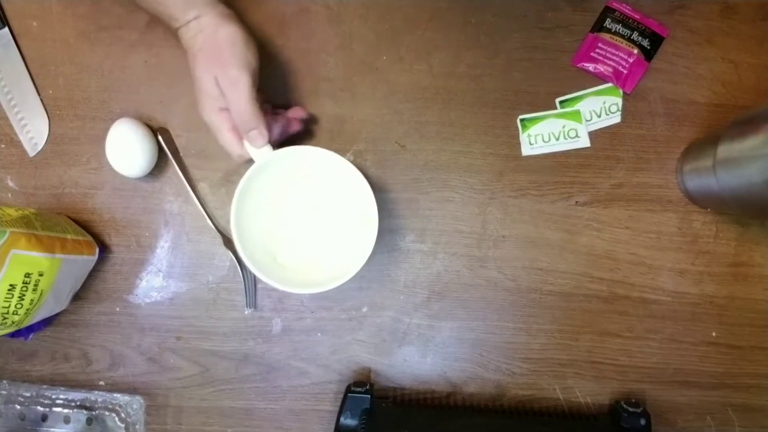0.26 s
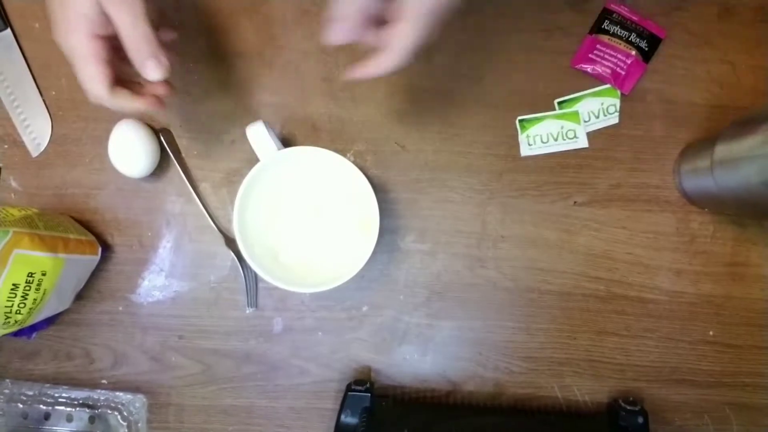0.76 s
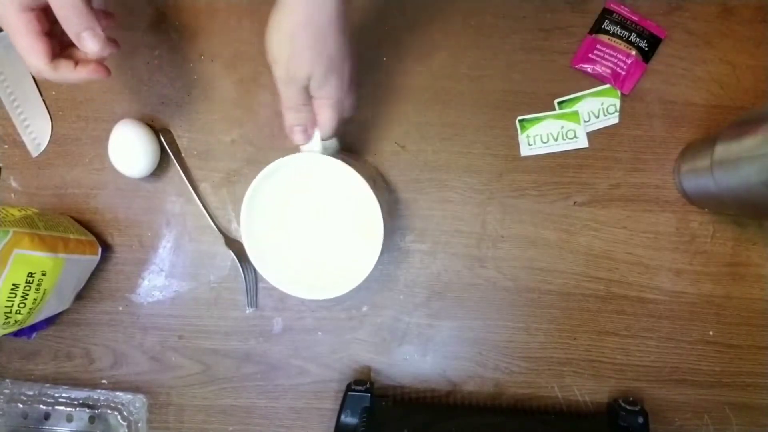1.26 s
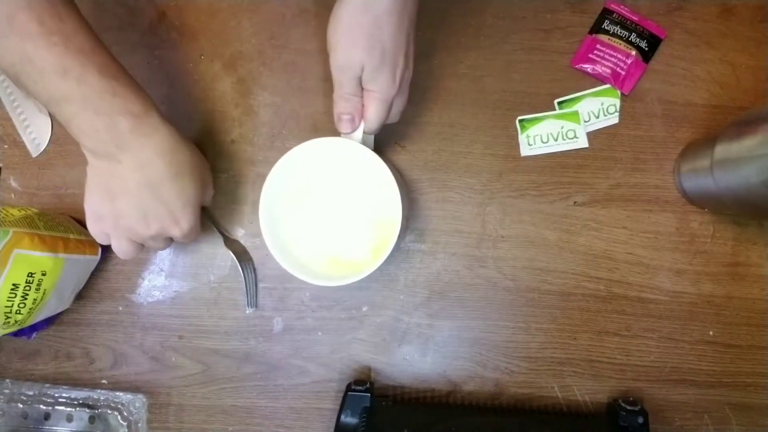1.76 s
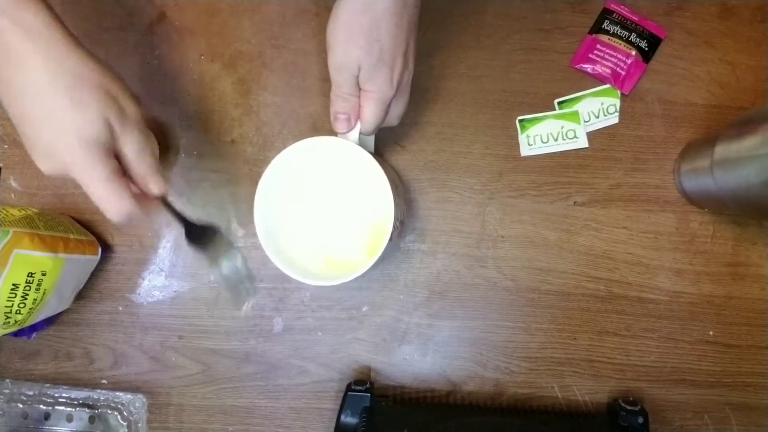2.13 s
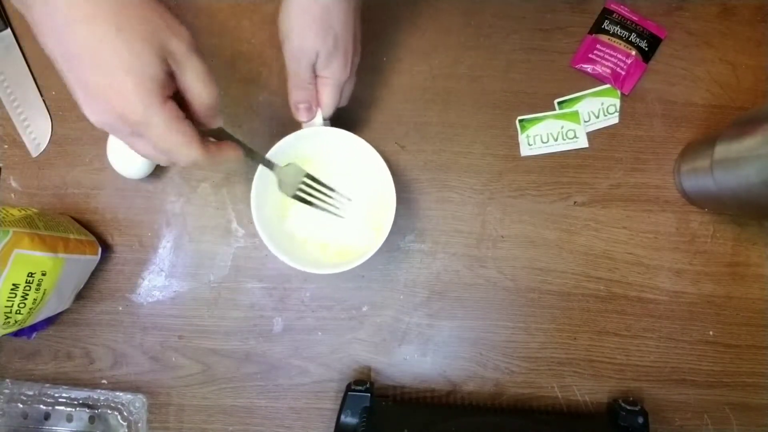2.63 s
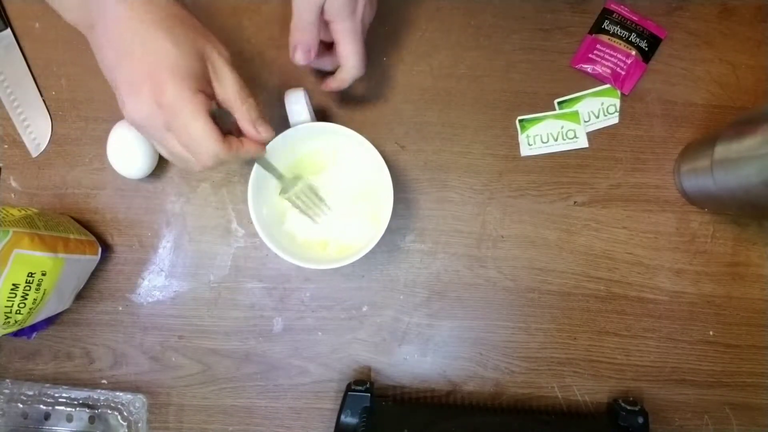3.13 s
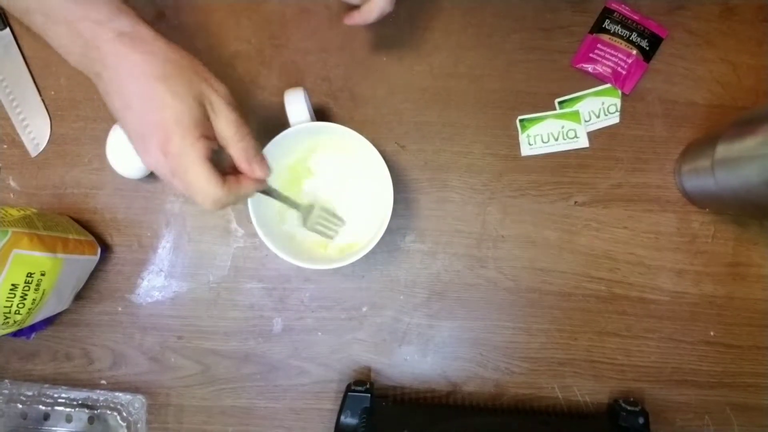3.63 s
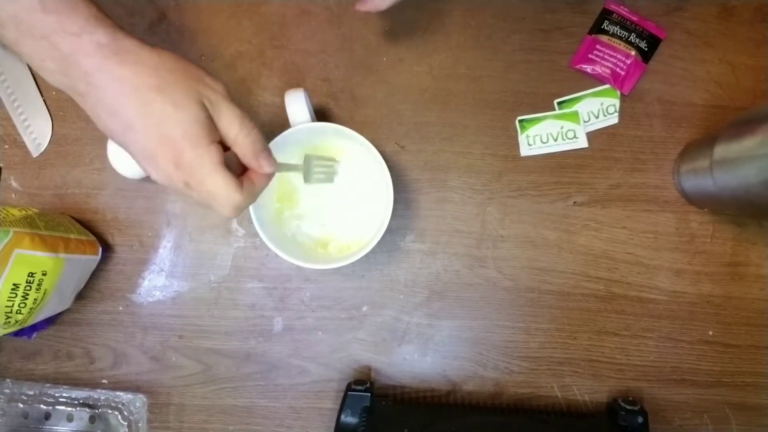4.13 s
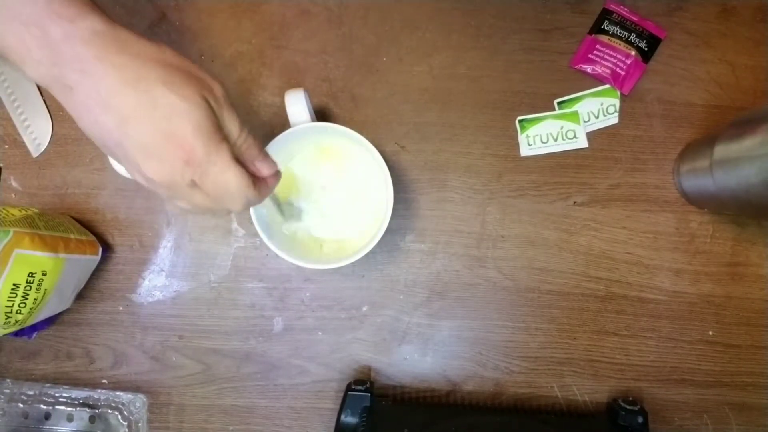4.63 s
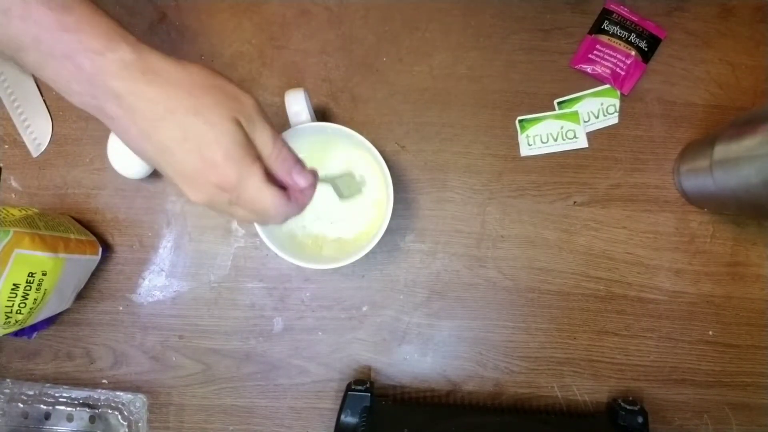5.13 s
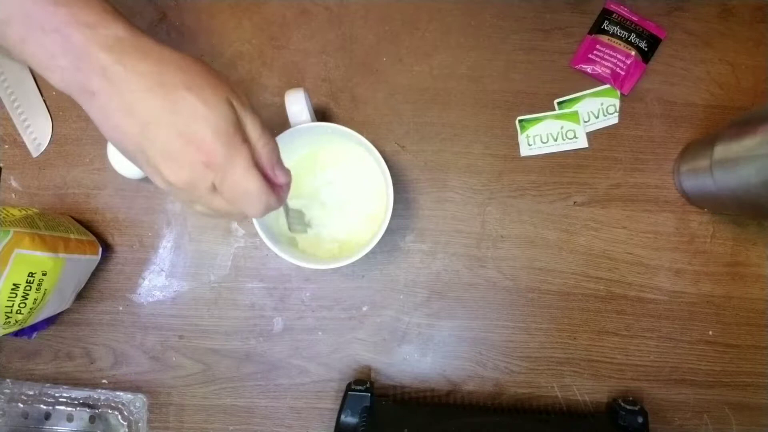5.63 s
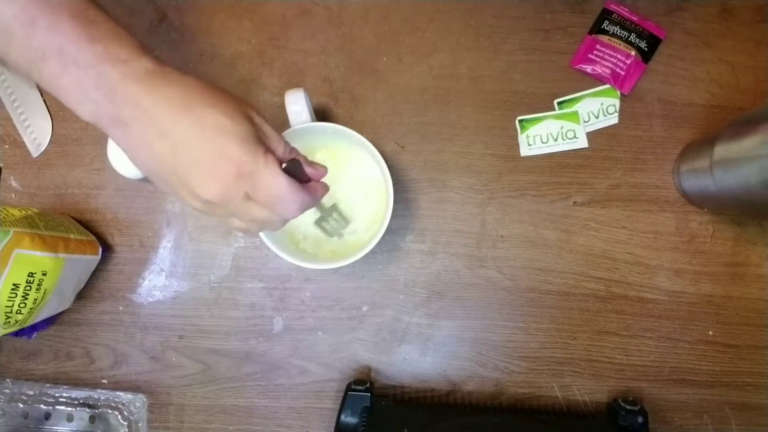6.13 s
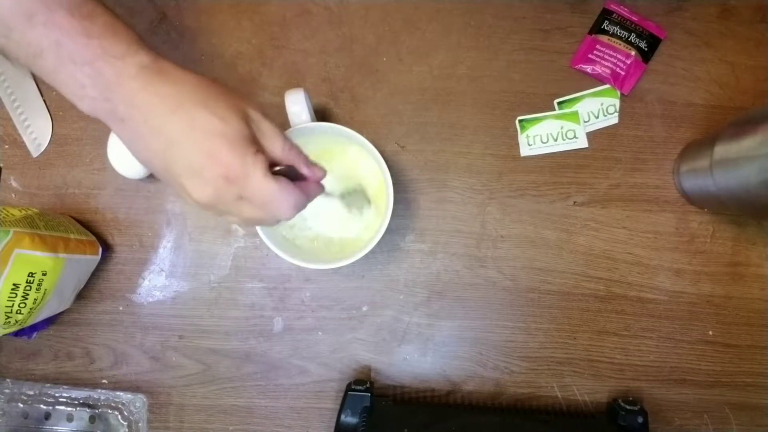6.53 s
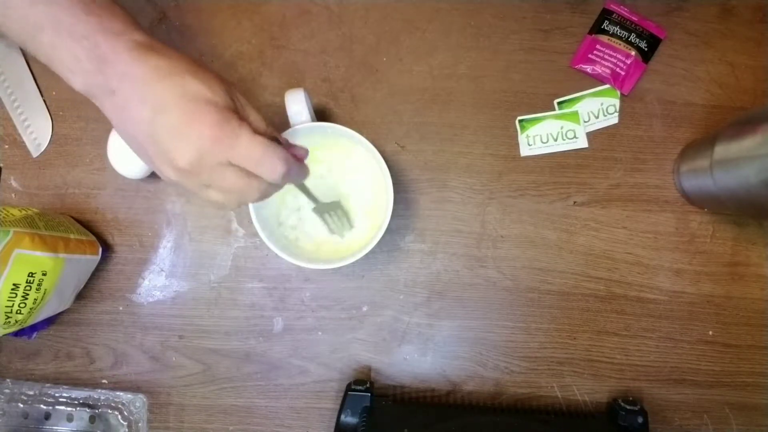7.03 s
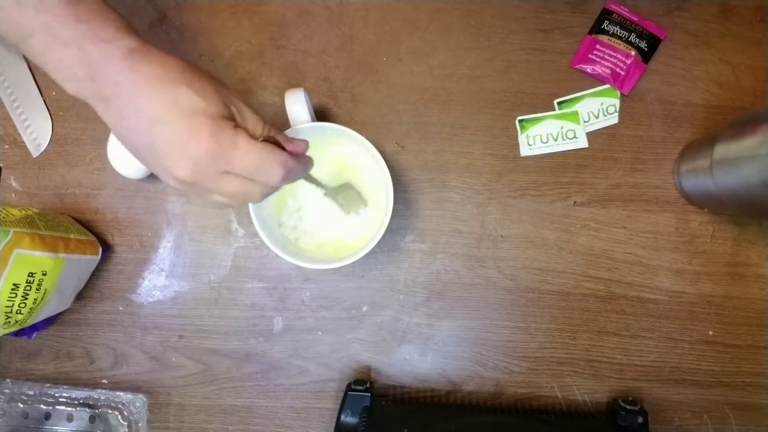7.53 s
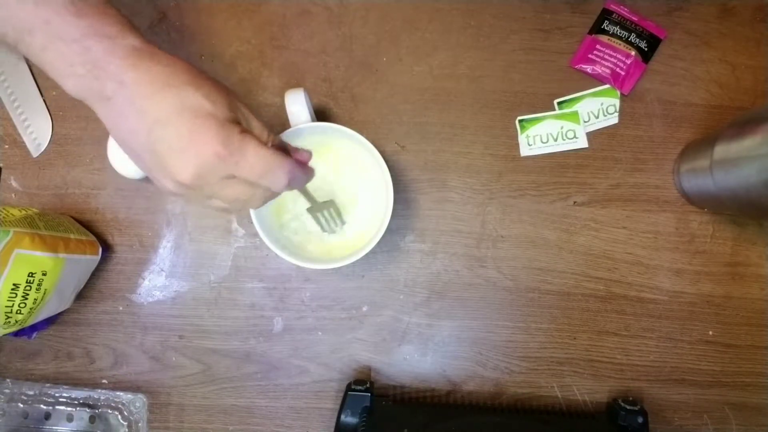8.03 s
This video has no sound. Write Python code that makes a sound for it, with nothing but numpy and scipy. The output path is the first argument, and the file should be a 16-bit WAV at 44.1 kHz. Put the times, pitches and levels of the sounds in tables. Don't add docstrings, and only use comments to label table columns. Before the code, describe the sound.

A ceramic mug lands on a wooden table with a hard knock, slides briefly and is shifted again. A fork is picked up with a small scrape, then stirs in the mug: hissing scrapes, quick bright taps, two clear ringing clinks and a thin squeak at the end. Low appliance rumble and faint buttery ticking lie behind it, heard in close stereo in a small, lightly echoing kitchen.

```python
import sys
import numpy as np
from scipy import signal
from scipy.fft import rfft, irfft, next_fast_len
from scipy.io import wavfile
from scipy.ndimage import uniform_filter1d, map_coordinates

SR = 44100
rng = np.random.default_rng(int(sys.argv[2]) if len(sys.argv) > 2 else 0)


def to_linear_factor(level_db):
    exponent = np.asarray(level_db, float) / 20
    return 10 ** exponent


def wrap_up_sound(samples):
    columns = np.atleast_2d(samples).T
    tamed = np.clip(columns, -1, 1)
    steps = np.round(tamed * 32767).astype(np.int16)
    wavfile.write(sys.argv[1], SR, steps)


N = 364707

# (frequency [Hz], density [dB per Hz])
GLAZE_COLOUR = [(600, -30.5), (1000, -10), (1500, 1.5), (2100, -14), (2500, -17), (3400, -12.5), (3900, -8),
                (4800, -7.5), (6300, -7.5), (7500, -8), (9200, -9), (12300, -2), (14100, -8.5),
                (15500, -19)]


def fork_hits():
    # (frequency [Hz], decay t60 [s], left-right difference
    # [dB], left lead [rad])
    mug_and_tine_modes = [(1549.5, .72, 10, 2.5), (1667.5, .56, -7, -.6), (3959, .2, 8, -2.4),
                          (4091, .36, -13, -1.6), (4153, .2, -2, -1.5), (5397, .23, 3, 1.6), (5652, .18, -3, .5),
                          (7569, .23, 10, .5), (7800, .15, -8, 2.1), (9900, .15, -10, .4), (10335, .3, -4, 1.1),
                          (11795, .13, -7, 1), (12235, .2, -4, .3), (13200, .17, -8, 1.4)]
    # (time [s], crack level [dB], level of each mode of mug and tine [dB])
    clinks = [
        (4.633, -28, [-29.5, -23, -23.5, -9, -31.5, -40.5, -45, -38, -32, -72, -66.5, -51, -66, -78.5]),
        (7.294, -27, [-25, -16.5, -23.5, -27.5, -21.5, -21.5, -44, -25.5, -37, -34.5, -63.5, -40, -49.5, -44.5]),
    ]
    rests = [.1, .2]
    # (time [s], crack level [dB], wall ring level [dB], place on the rim [degrees])
    taps = [(0.1418, -57, -44, 120), (1.895, -53, -74, 41), (3.012, -42, -85, 34), (3.085, -43, -89, 37),
            (3.211, -49.5, -89, 45), (3.269, -39, -79, 35), (3.4308, -53, -51, 78), (3.662, -43, -65, 29),
            (3.7732, -29.5, -55, 100), (3.801, -49, -39, 73), (3.907, -34, -61, 86),
            (4.2615, -42.5, -60, 21), (4.329, -36, -57, 58), (4.473, -32, -44, 29), (4.531, -33.5, -55, 89),
            (5.1355, -28, -50, 72), (5.205, -60, -50, 50), (5.587, -53.5, -82, 21),
            (5.877, -28.5, -56.5, 16), (6.004, -56, -53.5, 96), (6.154, -76, -52, 56),
            (6.218, -35.5, -62, 91), (6.49, -34.5, -57, 4), (6.4992, -28.5, -38, 2.5),
            (6.751, -41, -89, 20), (6.9302, -42, -59.5, 12), (7.136, -53.5, -48.5, 3),
            (7.186, -34.5, -47, 66), (7.618, -69, -53, 68), (8.074, -55, -63, 11),
            (8.114, -45.5, -42.5, 33)]
    # (time [s], level [dB])
    pings = [
        (1.9, -72),
        (3.774, -57),
        (4.328, -53),
        (5.137, -25.5),
        (5.589, -57.5),
        (6.216, -56),
        (6.49, -47),
    ]
    cracks, rings, touch = np.zeros((2, N)), np.zeros((2, N)), np.zeros((2, N))

    rebound_s, first_touch = 0.0043, 0.55
    for (s, db, levels), free in zip(clinks, rests):
        add(cracks, s, crack(db, t60=0.013))
        add(cracks, s + rebound_s, crack(db - 5.0, t60=0.029))
        clink = sum(ring(m, level, attack=0.00054, free=free, at=s) for m, level in zip(mug_and_tine_modes, levels))
        late = np.clip((np.arange(clink.shape[1]) / SR - rebound_s) / 0.001, 0, 1)
        add(rings, s, clink * (first_touch + (1 - first_touch) * late))

    for s, db, wall_db, place in taps:
        low = ring(mug_and_tine_modes[0], wall_db + 3, attack=0.014, life=0.8, span=0.5, at=s)
        second = ring(mug_and_tine_modes[1], wall_db + 0.5, attack=0.009, life=0.85, span=0.5, at=s)
        angle = np.radians(place)
        add(touch, s, np.cos(angle) * low + np.sin(angle) * second)
        add(cracks, s, crack(db - 15.0, t60=0.023))

    for s, db in pings:
        add(touch, s, ring(mug_and_tine_modes[6], db, attack=0.0072))
    return cracks, (rings + touch) * to_linear_factor(0.9 * wobble(30))


def crack(db, t60):
    t = np.arange(SR // 8) / SR
    glints = rng.uniform(3830, 14000, 5)

    def bright(f):
        glaze = to_linear_factor(along(GLAZE_COLOUR, f)) + 0.069 * (f > 1500) * (f < 15500)
        return glaze * (0.65 + 1.4 * sum(peak(f, hz, 270) for hz in glints))

    tick = 2.6 * to_linear_factor(-60 * t / 0.006)
    shape = (to_linear_factor(-60 * t / t60) + tick) * (1 - np.exp(-t / 0.0002))
    return to_linear_factor(db) * shape * unit(filtered(rng.standard_normal((2, len(t))), bright))


def ring(mode, db, attack, free=1, life=1, span=0.66, at=None):
    hz, t60, pan_db, lead = mode
    t = np.arange(int(SR * span)) / SR
    side = np.array([[0.5], [-0.5]])
    share = to_linear_factor(side * pan_db) / np.sqrt(np.mean(to_linear_factor(side * pan_db) ** 2))
    start = rng.random()
    if at is not None and hz < 2000:
        start = hz * round(at * SR) / SR
    wave = np.sin(2 * np.pi * (hz * t + start) + side * lead)
    damped_db = 400 * np.maximum(t - free, 0) * (hz > 3000)
    decay = to_linear_factor(db - 60 * t / (t60 * life) - damped_db)
    return share * decay * (1 - np.exp(-t / attack)) * wave


def stirring():
    # (time [s], time to fade [s], glaze hiss [dB],
    # mug hollow over hiss [dB], stem over hiss [dB])
    skids = [(1.898, 0.092, -62.5, -2, 5), (3.772, 0.14, -55.5, -1, 3), (3.907, 0.23, -61, -7, -1),
             (4.26, 0.16, -61.5, -4, -0.5), (4.329, 1, -64.5, -4, 1.5), (4.634, 0.05, -41.5, -9, 10),
             (5.137, 0.046, -42.5, -27, 6), (5.21, 0.23, -66.5, -13, 1.5), (5.589, 0.22, -66.5, -3, 5),
             (5.877, 0.1, -54, -7, -3.5), (6.002, 0.075, -56.5, 0, 0.5), (6.215, 0.23, -56, -9, -1),
             (6.495, 0.089, -50.5, 4, -10.5), (6.751, 0.12, -70, -15, -3), (6.928, 0.084, -55, -4, -9.5),
             (7.135, 0.056, -59.5, -3, -4), (7.185, 0.47, -57.5, -23, -3), (7.296, 0.04, -37.5, -9, 2),
             (7.498, 0.17, -61.5, -17, -27.5), (8.112, 0.077, -53, -24, -30)]
    # (middle [s], half length [s], glaze hiss [dB],
    # mug hollow over hiss [dB], stem over hiss [dB])
    sweeps = [(3.4, 0.25, -59, -15, -3.5), (3.7, 0.16, -74.5, -19, 0), (4.055, 0.11, -59, -2, -2),
              (4.5, 0.13, -74.5, 6, 11.5), (4.61, 0.047, -57, -20, -12), (4.7, 0.082, -57.5, 4, 3),
              (4.81, 0.13, -54, 1, -4), (4.972, 0.051, -54, -8, 0), (5.07, 0.058, -57, 11.5, -3.5),
              (5.26, 0.19, -60.5, -25, -1), (5.35, 0.08, -67, 11, 1.5), (5.7, 0.072, -70.5, 8.5, 0.5),
              (5.78, 0.019, -76.5, 21.5, -23.5), (6.44, 0.073, -58, 0, -17.5), (6.58, 0.053, -56.5, 8, -16),
              (6.82, 0.05, -57.5, -1, -23), (7.38, 0.079, -52.5, 4.5, -3), (7.64, 0.12, -63, -19, -17),
              (7.74, 0.082, -58.5, 0, -17), (7.875, 0.065, -62, 15.5, -32), (8.04, 0.1, -64.5, -13, -24),
              (8.25, 0.073, -60.5, -31, -11.5)]
    # (middle [s], half length [s], level [dB])
    whistles = [(3.79, .03, -60), (4.055, .08, -64), (4.6, .04, -58), (4.985, .06, -52), (5.16, .05, -54),
                (5.325, .075, -51), (5.66, .11, -61), (6.83, .05, -64)]

    def layers(rows):
        return [(s, length, db, db + hollow_db, db + stem_db) for s, length, db, hollow_db, stem_db in rows]

    hiss, hollow, stem = fades(layers(skids)) + swells(layers(sweeps))
    tine = to_linear_factor(-13.5) * hiss + swells(whistles)[0]
    grit = to_linear_factor(2.5 * wobble(300) + 1.5 * wobble(40))
    glints = rng.uniform(2000, 14500, size=50)

    def glinting(f):
        return colour(GLAZE_COLOUR)(f) * (1 + to_linear_factor(2) * sum(peak(f, hz, 39.6) for hz in glints))

    def stem_and_neck(f):
        return peak(f, 2080, 200) ** 2 + to_linear_factor(-10.5) * peak(f, 2830, 475) ** 2

    rub = to_linear_factor(7) * hiss * unit(grit * patches(noise(glinting), patchy_db=4.0))
    rub += hollow * unit(to_linear_factor(2 * wobble(70)) * noise(lambda f: peak(f, 4620, 400) ** 2))
    return rub + tine * noise(lambda f: peak(f, 5652, 40)) + stem * noise(stem_and_neck)


def fork_notes():
    # (time [s], level [dB], low note [Hz], middle note [Hz], high note [Hz])
    landings = [(1.8981, -64, 4760, 8570, 12400), (3.2685, -47, 5030, 10000, 13800),
                (3.7714, -32.5, 5250, 11000, 12040), (3.908, -46, 5000, 11100, 12500),
                (4.2597, -43, 4970, 9340, 12100), (4.3291, -37, 5410, 9900, 11960),
                (5.1356, -24.5, 4900, 9900, 11670), (5.2094, -41, 5620, 8480, 13900),
                (5.877, -36, 5100, 9320, 11450), (6.0018, -41.5, 5000, 10000, 12400),
                (6.2167, -45, 4880, 10100, 11900), (6.4887, -35, 4690, 9840, 12500),
                (6.9293, -45.5, 6980, 9710, 12000), (7.1357, -45, 5490, 10800, 11840),
                (7.1843, -42, 4880, 9400, 12200)]
    shares_db, decays_s = (-13, -18, -5.5), (0.17, 0.036, 0.082)
    out = np.zeros((2, N))
    for s, db, *pitches in landings:
        for hz, share_db, t60 in zip(pitches, shares_db, decays_s):
            add(out, s, ring((hz, t60, 0, rng.normal()), db + share_db, attack=0.00065, span=0.15))
    return out * to_linear_factor(3.9 * wobble(200))


def clonks():
    # (time [s], frequency [Hz], level [dB], decay t60 [s])
    clonk_rows = [(.141, 828, -13, .06), (0.143, 970, -11, 0.031), (.14, 1506, -22.5, 0.057),
                  (.141, 1890, -26, 0.035), (4.635, 4100, -18, 0.06), (0.25, 980, -31, 0.036),
                  (.334, 620, -32, 0.091), (1.898, 2500, -43, 0.047), (5.137, 12000, -41.5, 0.054),
                  (7.2975, 4150, -4.5, 0.026), (5.136, 2120, -43, 0.036), (8.062, 1485, -55, 0.15),
                  (8.093, 1600, -49, 0.13), (8.112, 9830, -39, 0.025), (8.113, 11000, -38.5, 0.046)]
    out = np.zeros((2, N))
    for s, hz, db, t60 in clonk_rows:
        add(out, s, ring((hz, t60, -1, -0.4), db, attack=0.0022, span=0.15))
    return out


def scratches():
    # (time [s], peak level [dB], frequency [Hz])
    rough_spots = [(3.8945, -49, 12400), (4.0113, -36, 5000), (4.0472, -40, 7890), (4.6049, -48, 4140),
                   (4.7867, -39, 4730), (4.954, -39, 7570), (4.9721, -38, 5650), (5.0444, -41, 4780),
                   (5.058, -31, 4870), (5.3465, -45, 5650), (5.7688, -46, 4490), (6.3723, -38, 12100),
                   (6.551, -37, 4520), (6.7984, -39, 13800), (6.8194, -40, 4730), (7.4969, -43, 6010),
                   (7.7179, -34, 12400), (7.8491, -37, 4260), (7.866, -35, 4230), (7.9952, -52, 4360),
                   (8.2207, -32, 12000)]
    out = np.zeros((2, N))
    for s, db, hz in rough_spots:
        add(out, s, ring((hz, 0.026, 0, rng.normal()), db - 6, attack=0.001, span=0.06))
        add(out, s, crack(db - 26, t60=0.015))
    return out


def squeaks():
    # (middle [s], half length [s], tone level [dB], octave level [dB])
    squeak_rows = [
        (7.53, 0.035, -54.5, -76),
        (8.134, 0.032, -43.5, -31.5),
        (8.17, 0.066, -60, -60),
        (8.227, 0.05, -48.5, -41.5),
    ]
    tone, octave = swells(squeak_rows, flat=2.1, rise=0.29)
    slip_hz = 6018 * (1 + 0.00306 * wobble(120))
    phase = 2 * np.pi * np.cumsum(slip_hz) / SR
    flutter = to_linear_factor(3 + 1.6 * wobble(110))
    low = tone * np.sin(phase + [[0], [1.2]])
    high = octave * to_linear_factor([[2], [-2]]) * np.sin(2 * phase + [[0], [0.8]])
    return flutter * (low + high)


def knocks():
    # (time [s], peak level [dB], deep thump [dB], decay t60 [s])
    knock_rows = [(0.138, -7.5, -22, 0.13), (0.179, -18.5, -46, 0.059), (0.325, -23.5, -3, 0.08),
                  (0.346, -22.5, -2.5, 0.068), (1.897, -42.5, -37, 0.093), (2.768, -19, -1.5, 0.14),
                  (3.769, -30, -0.5, 0.2), (3.907, -43.5, -15, 0.049), (4.329, -37, -6, 0.17),
                  (4.474, -37, -42, 0.21), (4.633, -33.5, -0.5, 0.37), (5.134, -18, 1.5, 0.12),
                  (5.878, -41.5, 8, 0.18), (6.001, -31.5, -8, 0.25), (6.216, -33, -25, 0.19),
                  (6.929, -36, 7.5, 0.11), (7.132, -35, -2, 0.17), (7.185, -46, 6, 0.18),
                  (7.295, -37.5, -16, 0.41)]
    out, t = np.zeros((2, N)), np.arange(SR // 3) / SR
    for s, db, deep_db, t60 in knock_rows:
        force = 0.13 * rng.standard_normal((1, len(t))) + 0.018 * rng.standard_normal((2, len(t)))
        force[:, 50:80] += 0.2 * np.hanning(30)
        force[:, 50:62] += 0.5 * to_linear_factor(0.71 * (db + 6)) * np.hanning(12)
        force[:, :50] = 0
        corner_hz = 1900 * to_linear_factor(-0.3 * (deep_db + 18.5))

        def weight(f):
            deep = to_linear_factor(deep_db + 3.0) / (1 + 1j * f / 230) ** 2
            return (1 + deep) / (1 + 1j * f / corner_hz) ** 2

        body = filtered(force * to_linear_factor(-60 * t / max(t60, 0.03)), lambda f: table_top(f) * weight(f))
        add(out, s, to_linear_factor(db + 1.0 + np.array([[-1.1], [1.1]])) * body / np.abs(body).max())
    return out


def table_thumps():
    # (time [s], frequency [Hz], level [dB], decay t60 [s])
    thump_rows = [(0.0, 85, -37.5, 0.37), (0.331, 380, -28, 0.082), (1.378, 206, -28, .11),
                  (1.402, 193.7, -24, .14), (.15, 98, -34.5, 0.38), (2.769, 161, -23, 0.16),
                  (2.779, 70.6, -36, .2), (4.33, 100, -48, 0.18), (5.14, 387, -24, 0.12),
                  (6.003, 97.6, -41, 0.32), (6.22, 291, -39.5, .15), (7.187, 98, -39, 0.36)]
    out = np.zeros((2, N))
    for s, hz, db, t60 in thump_rows:
        add(out, s, ring((hz, t60, 0, 0), db, attack=0.0029, span=0.4, at=0))
    return out


def slides():
    # (middle [s], half length [s], drone level [dB], rasp level [dB])
    slide_rows = [(0.0, 0.088, -42, -53.5), (.24, 0.056, -58, -58), (.3, 0.19, -40.5, -74),
                  (.88, 0.45, -74, -65), (1.36, 0.12, -39, -58.5), (1.41, 0.095, -40, -51.5),
                  (.165, 0.064, -75, -45), (.35, 0.076, -70, -52), (1.83, 0.036, -47, -58),
                  (1.928, 0.066, -52, -51), (2.0, 0.043, -58, -78), (2.63, 0.28, -50.5, -61.5),
                  (3.32, .08, -53, -53.5), (3.44, 0.21, -72, -56.5)]
    # (frequency [Hz], density [dB per Hz])
    wood_rasp = [(500, -12), (900, -0.5), (1500, -2), (2500, -8), (4000, -20), (7000, -32), (14000, -29.5),
                 (16000, -44)]
    drone, rasp = swells(slide_rows)
    board = noise(lambda f: table_top(f) / (1 + (f / 270) ** 2))
    grain = to_linear_factor(-2.5 + 2.2 * wobble(130)) * noise(colour(wood_rasp))
    return drone * to_linear_factor(0.75 * wobble(40.4)) * board + rasp * grain


def table_top(f):
    # (frequency [Hz], width [Hz], level [dB])
    board_modes = [(85, 3, -8.5), (192.4, 27.7, 7), (293.8, 38, 3), (363.3, 19.2, 5.5), (492, 38, 1.5),
                   (612, 38, 1), (855, 109, -2), (1330, 250, -11.5), (1860, 350, -11)]
    return sum((-1) ** k * to_linear_factor(db) * peak(f, hz, w) for k, (hz, w, db) in enumerate(board_modes))


def kitchen():
    # (time [s], rumble level [dB])
    gain_curve = [
        (0.0, -51.5),
        (0.18, -49.5),
        (0.51, -58),
        (0.9, -57.5),
        (1.47, -51),
        (2.7, -50.5),
        (8.27, -51),
    ]
    # (frequency [Hz], density [dB per Hz])
    rumble_colour = [(15, -42.5), (25, -30.5), (43, -5.5), (59, -1.5), (77, -8), (205, 1), (226, -5),
                     (325, -15.5), (359, -5), (466, -17), (668, -16.5), (738, -17), (1370, -29),
                     (1610, -35), (3000, -52), (3900, -70.5), (6600, -120)]
    # (frequency [Hz], density [dB per Hz])
    hiss_colour = [(1180, -31.5), (2000, -5), (3520, -7.5), (4130, -5.5), (4690, -10.5), (7710, -5.5),
                   (9680, -11), (12100, -3), (15000, -5.5)]
    rumble = to_linear_factor(np.interp(np.arange(N) / SR, *np.transpose(gain_curve)))
    stirred = np.arange(N) > 3.3 * SR

    ticks = (rng.random(N) < 55 / SR) * to_linear_factor(3.2 * rng.standard_normal(N))
    bursts = signal.fftconvolve(ticks, to_linear_factor(-60 * np.arange(900) / SR / 0.014))[:N]
    sizzle = bursts * noise(lambda f: peak(f, 11500, 5000) ** 2)
    butter = to_linear_factor(4.0 - 16.5 * stirred) * patches(sizzle, patchy_db=5.5)

    hiss = unit(patches(noise(colour(hiss_colour)), patchy_db=4.0)) + butter
    hiss = to_linear_factor(-41.0 - 4.5 * stirred) * rumble ** 0.5 * hiss
    hiss += to_linear_factor(-84.0 + 1.8 * wobble(9.4)) * noise(lambda f: peak(f, 2080, 45))
    sway = to_linear_factor(2.5 + 1.2 * wobble(6) + [[-0.6], [0.6]])
    return rumble * sway * noise(colour(rumble_colour)) + hiss


def room(x):
    # (frequency [Hz], decay t60 [s])
    wall_decay = [(150, 0.14), (1000, 0.2), (5000, 0.22), (14000, 0.061)]
    hz, t, z = signal.stft(rng.standard_normal((2, SR // 2)), SR, nperseg=256)
    tail = signal.istft(z * to_linear_factor(-60 * t / along(wall_decay, hz)[:, None]), SR, nperseg=256)[1]
    tail = tail - filtered((tail - tail[::-1]) / 2, lambda f: 1 / (1 + (f / 380) ** 2))
    delayed = np.pad(x, ((0, 0), (300, 0)))
    return signal.fftconvolve(delayed, tail / np.linalg.norm(tail[0]), axes=1)[:, :N]


def noise(response):
    # (frequency [Hz], left-right likeness [-1 to 1])
    likeness = [(60, 0.82), (130, 0.91), (290, 0.86), (640, 0.23), (1410, -0.059), (3100, 0.11),
                (6820, -0.036), (15000, 0.057)]

    def turn(f):
        return np.arccos(np.clip(along(likeness, f), -1, 1)) / 2

    mid, side = filtered(rng.standard_normal((2, N)),
                         lambda f: response(f) * [np.cos(turn(f)), np.sin(turn(f))])
    return unit(np.array([mid + side, mid - side]))


def patches(x, patchy_db):
    z = signal.stft(x, nperseg=256)[2]
    field = uniform_filter1d(rng.standard_normal(z.shape[1:]), size=2, axis=0)
    field = uniform_filter1d(field, size=22, axis=1)
    return signal.istft(z * to_linear_factor(patchy_db * unit(field)), nperseg=256)[1][:, :N]


def swells(rows, flat=1.17, rise=1):
    out = np.zeros((len(rows[0]) - 2, N))
    for s, half, *dbs in rows:
        start = max(s - 3 * half, 0)
        t = start + np.arange(int(6 * half * SR)) / SR
        away = abs(t - s) / np.where(t < s, rise * half, half)
        add(out, start, to_linear_factor(np.array(dbs)[:, None]) * to_linear_factor(-20 * away ** flat))
    return out


def fades(rows):
    s, fade, *dbs = np.transpose(rows)
    t = np.arange(N) / SR
    now = np.searchsorted(s, t) - 1
    return (now >= 0) * to_linear_factor(np.array(dbs)[:, now] - 20 * (t - s[now]).clip(0) / fade[now])


def wobble(rate):
    knots = rng.standard_normal(int(N * rate / SR) + 4)
    return map_coordinates(knots, [np.arange(N) * rate / SR])


def peak(f, hz, width):
    return 1j * f * width / (hz * hz - f * f + 1j * f * width)


def colour(points):
    return lambda f: to_linear_factor(along(points, f))


def along(points, hz):
    f, v = np.transpose(points)
    return np.interp(np.log(hz + 1), np.log(f + 1), v)


def filtered(x, response):
    m = next_fast_len(x.shape[-1] + 8192)
    return irfft(rfft(x, m) * response(np.fft.rfftfreq(m, 1 / SR)), m)[..., :x.shape[-1]]


def unit(x):
    return x / np.sqrt(np.mean(x ** 2) + 1e-20)


def add(track, s, sound):
    part = track[:, round(s * SR):][:, :sound.shape[1]]
    part += sound[:, :part.shape[1]]


def scene():
    cracks, rings = fork_hits()
    blows = cracks + knocks()
    echoed = blows + to_linear_factor(-3.0) * room(blows)
    fork = rings + stirring() + fork_notes() + scratches() + squeaks()
    table = clonks() + table_thumps() + slides()
    return echoed + fork + table + kitchen()


def starved(x, margin_db, spread_db):
    # (frequency [Hz], margin [dB])
    survival = [(2200, 3), (2550, 0), (2900, 3), (3250, 1), (3600, -3.5), (3900, 5), (4400, -1),
                (5700, 8.5), (6200, -2.5), (6800, 10), (7400, 5.5), (8400, 11.5), (9000, 6), (9700, 10),
                (15000, 8.5)]
    hz, _, z = signal.stft(x, SR, nperseg=1024)
    bands = z[:, :512].reshape(2, 128, 4, -1)
    power = uniform_filter1d(np.mean(np.abs(bands) ** 2, axis=(0, 2)), size=3, axis=1)
    level = uniform_filter1d(10 * np.log10(np.abs(power) + 1e-20), size=3, axis=0)
    treble = np.median(level[24:84], axis=0)
    calm = np.median(treble)
    ceiling = np.minimum(treble + 0.22 * (treble - calm), calm + 16)
    ceiling = ceiling - 0.85 * np.maximum(calm - treble, 0)
    luck = unit(uniform_filter1d(rng.standard_normal(level.shape), size=9, axis=1))
    limit = ceiling - margin_db - along(survival, hz[2:512:4])[:, None] + spread_db * luck
    keep = 1 / (1 + to_linear_factor(np.clip(20 * (limit - level), -60, 60)))
    keep[hz[:512:4] < 2200] = 1
    click = np.roll(np.diff(treble, prepend=calm) > 4.5, 1)
    keep[hz[:512:4] > 14620] = to_linear_factor(-37.0) + click
    z[:, :512] *= np.repeat(keep, 4, axis=0)
    return signal.istft(z, SR, nperseg=1024)[1][:, :N]


def top_cut(x):
    return signal.sosfilt(signal.butter(12, 15600, fs=SR, output="sos"), x)


def record(dry):
    mix = starved(dry, margin_db=1.64, spread_db=3)
    return top_cut(mix)


dry = scene()
out = record(dry)
wrap_up_sound(out)
```